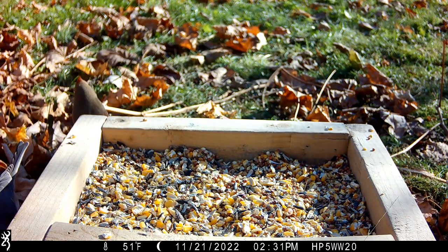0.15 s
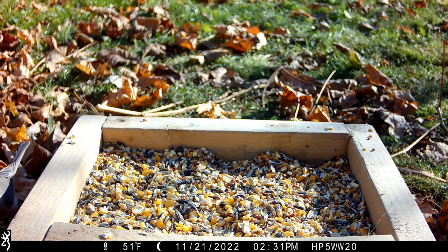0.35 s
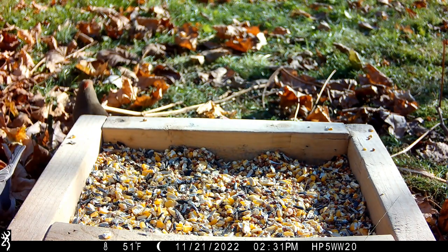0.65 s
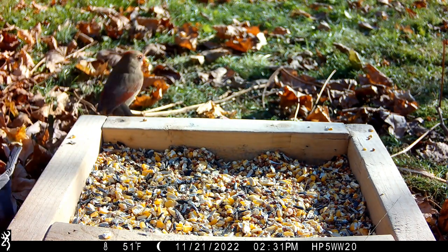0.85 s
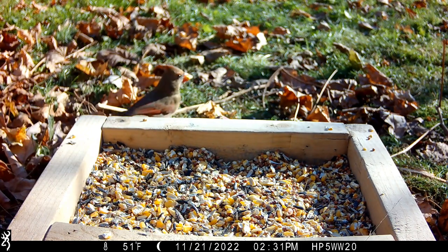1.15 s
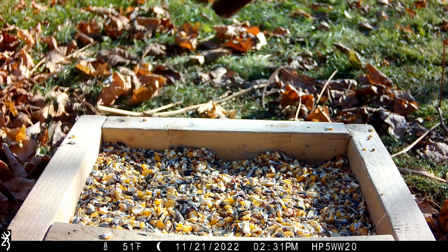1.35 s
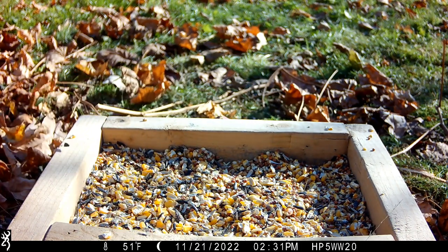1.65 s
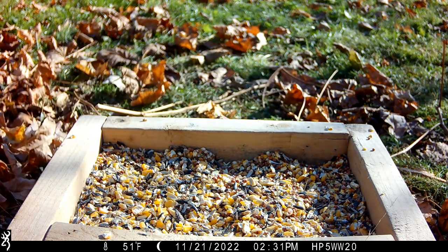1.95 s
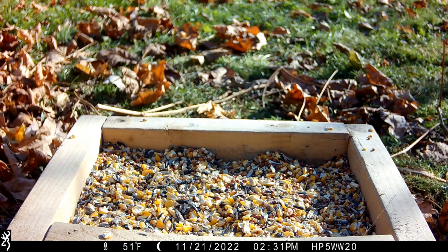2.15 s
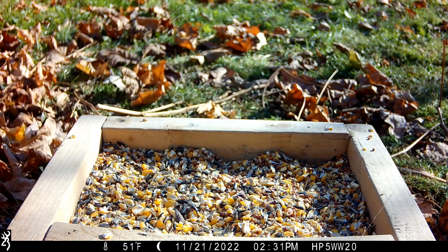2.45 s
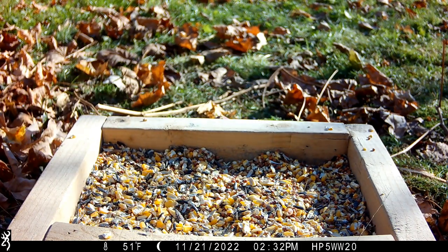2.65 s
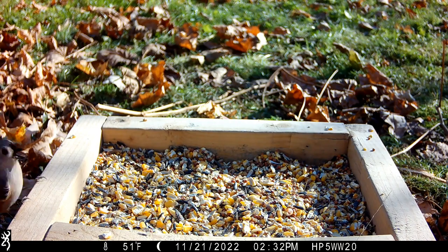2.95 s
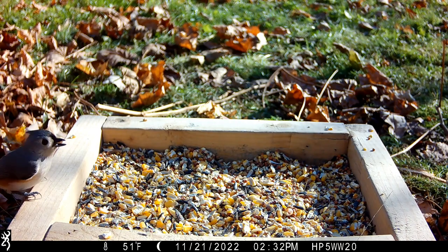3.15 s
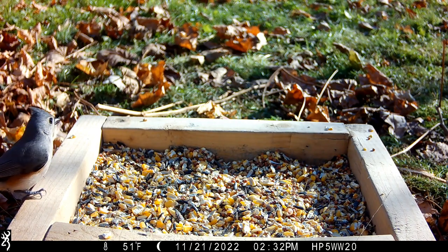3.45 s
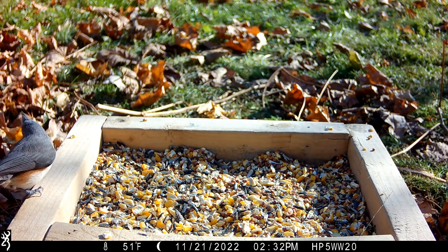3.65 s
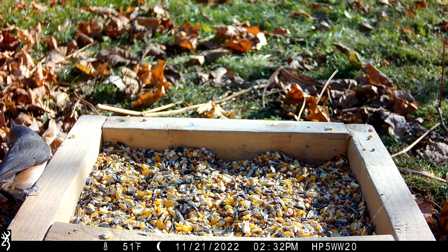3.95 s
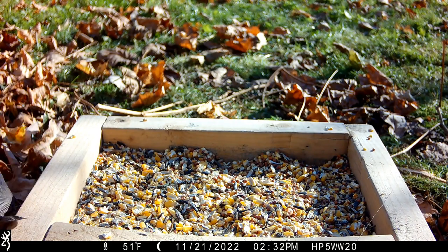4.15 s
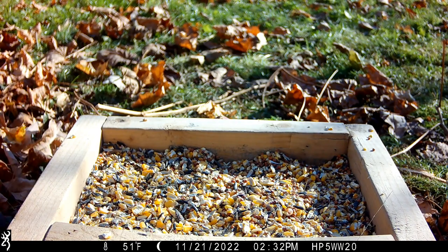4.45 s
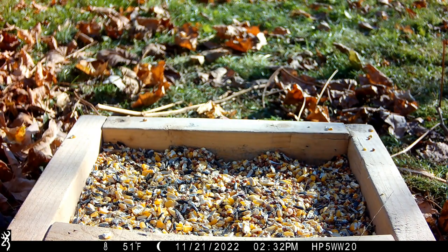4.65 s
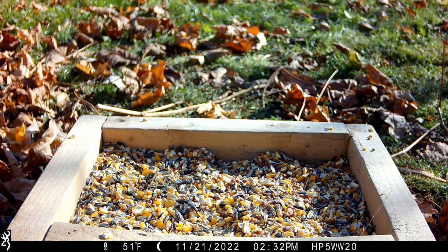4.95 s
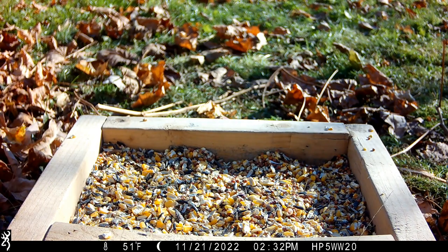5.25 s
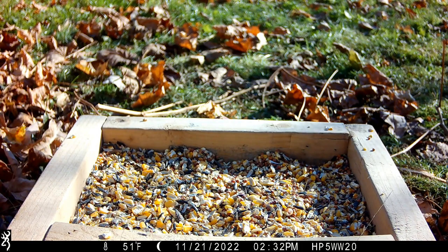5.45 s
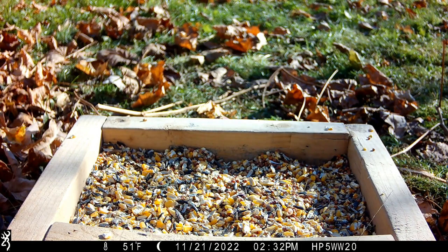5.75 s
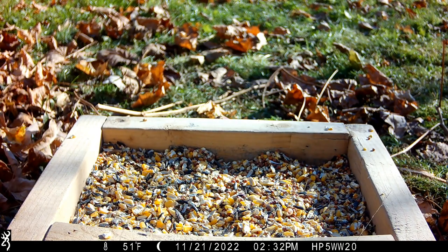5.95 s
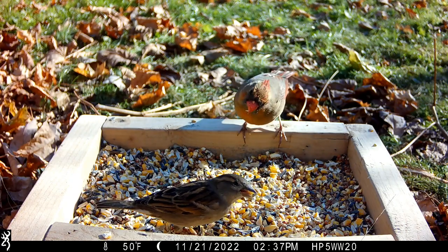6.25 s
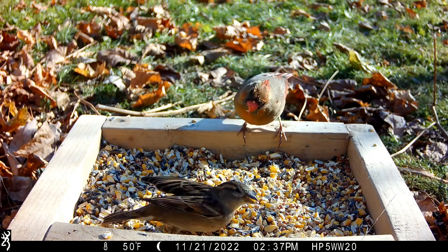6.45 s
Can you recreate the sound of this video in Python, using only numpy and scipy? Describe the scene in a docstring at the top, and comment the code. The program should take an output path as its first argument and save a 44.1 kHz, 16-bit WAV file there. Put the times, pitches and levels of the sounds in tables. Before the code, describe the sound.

A steady, quiet outdoor hush surrounds a small mono microphone on the rim of a garden feeding tray. A close chirp leads into a brief flurry of wingbeats and leaf rustles, with faint birds farther off. Midway, a thin high whistle runs straight into three nasal, slightly raspy calls from a small songbird, the loudest sounds. Afterwards come short claw scrapes on wood and a couple of light crunches in seed.

```python
"""On a lawn, at a wooden seed tray: a small songbird gives a thin high note and three nasal calls.
One side of its syrinx whistles the note; in the calls both sides sound and modulate each other.
Other birds chip and whistle, wingbeats puff and swish, dry leaves rustle, and feet tick on the wood,
scuff it and crunch the seed, all over a steady outdoor hush.
A small mono camera microphone with a faint whine sits at the edge of the tray."""
import sys
import numpy as np
from scipy import signal
from scipy.fft import rfft, irfft, next_fast_len
from scipy.io import wavfile
from scipy.ndimage import uniform_filter1d

SR = 44100
rng = np.random.default_rng(int(sys.argv[2]) if len(sys.argv) > 2 else 0)


def transcribe(u):
    """Save the signal u as a 16-bit wav file named by the first command-line argument.

    u: samples, shape (n,) or (channels, n), limited to [-1, 1]; the rate is SR.
    q: integer samples, one column per channel.
    """
    v = np.clip(np.atleast_2d(u).T, -1, 1)
    q = np.round(v * 32767).astype(np.int16)
    wavfile.write(sys.argv[1], SR, q)


N = 291060
TIME = np.arange(N) / SR


def undb(db):
    """Decibels to gain."""
    return 10 ** (np.asarray(db) / 20)


def unit(x):
    """Scale to rms 1."""
    return x / np.sqrt(np.mean(x ** 2) + 1e-18)


def noise():
    """White noise."""
    return rng.standard_normal(N)


def wander(rate):
    """Smooth random motion with spread 1, about rate turns a second."""
    size = max(int(SR / rate), 2)
    return unit(uniform_filter1d(uniform_filter1d(noise(), size), size))


def colour(x, points):
    """Minimum-phase EQ through (f/Hz, gain/dB) points; the result has rms 1."""
    hz, db = np.transpose(points)
    size = 2 * next_fast_len(N // 2 + 2048)
    grid = np.maximum(np.arange(size // 2 + 1) * SR / size, 1)
    response = undb(np.interp(np.log(grid), np.log(hz), db))
    cepstrum = irfft(np.log(response))
    cepstrum[1:size // 2] *= 2
    cepstrum[size // 2 + 1:] = 0
    return unit(irfft(rfft(x, size) * np.exp(rfft(cepstrum)))[:N])


def resonance(hz, centre_hz, width_hz):
    """Bell-shaped response, 1 at the centre."""
    return 1 / (1 + (2 * (hz - centre_hz) / width_hz) ** 2)


def steady(x, seconds):
    """Even out the level of a carrier over the given time."""
    power = uniform_filter1d(x ** 2, max(int(seconds * SR), 2))
    return x / np.sqrt(np.abs(power) + 1e-9)


def envelope(start, hold, attack, decay):
    """Exponential rise up to the start, a hold at 1, exponential decay."""
    t = TIME - start
    return np.exp(np.maximum(np.minimum(t, 0) / attack - np.maximum(t - hold, 0) / decay, -30))


def controls(notes):
    """A gate that is open while any note runs, then the notes' columns as automation curves."""
    gate = sum(((TIME >= rows[0][0]) & (TIME <= rows[-1][0])) * 1. for rows in notes)
    s, *columns = np.vstack(notes).T
    return [uniform_filter1d(gate, size=40)] + [np.interp(TIME, s, c) for c in columns]


def grains(spread_db, points):
    """Dense tiny impacts of uneven size ringing a body of the given colour."""
    return colour(noise() * undb(spread_db * wander(1500)), points)


# EQ of the background bed: f/Hz, gain/dB
HUSH_EQ = [(15, -55), (25, -13), (55, -18), (86, -13), (183, -14.5), (240, -12), (389, -10.5), (648, -3.5),
           (1110, -2), (1530, -1.5), (2360, -2.5), (6730, -30.5), (7700, -34), (8580, -33.5), (15500, -26)]
# its fader ride, before the trim: t/s, level/dB
HUSH_RIDE = [(0.0, -49.5), (0.96, -49.5), (6.6, -52)]


def hush(trim_db=-1.67, whine_hz=7810, whine_db=-88):
    """Steady outdoor air and microphone hiss, with a faint electronic whine."""
    s, db = np.transpose(HUSH_RIDE)
    air = colour(noise(), HUSH_EQ) * undb(np.interp(TIME, s, db) + trim_db)
    return air + undb(whine_db) * np.sqrt(2) * np.sin(2 * np.pi * whine_hz * TIME)


# EQ of the crisp top on leaves, claws, feathers and seed: f/Hz, gain/dB
CRISP_EQ = [(3000, -37), (7000, -18), (9500, -1.5), (12000, 7.5), (14000, 9), (16000, 0)]


def scrape(levels, points, body_spread_db, top_spread_db, trim_db=0):
    """Crowds of small contacts: a woody body with a crisp top."""
    body_level, top_level = levels
    body = steady(grains(body_spread_db, points), 0.015)
    top = grains(top_spread_db, CRISP_EQ)
    return undb(trim_db) * (body_level * body + top_level * top)


def stirs(rows, patchy_db, rate, attack_s=0.025):
    """Restless movement that swells, goes on unevenly and dies away: levels of body and treble."""
    body = top = 0
    uneven = undb(patchy_db * wander(rate))
    for s, length, db, decay, treble_db in rows:
        force = undb(db) * envelope(s, length, attack_s, decay)
        body, top = np.maximum(body, force), np.maximum(top, undb(treble_db) * force)
    return body * uneven, top * uneven


def crackles(per_s=45, decay_s=.0012, low_cut_hz=3500):
    """Sparse bright snaps of dry leaves."""
    snaps = (rng.random(N) < per_s / SR) * rng.random(N)
    bursts = signal.lfilter([1], [1, -np.exp(-1 / (decay_s * SR))], snaps) * noise()
    return unit(signal.sosfilt(signal.butter(2, low_cut_hz, "high", fs=SR, output="sos"), bursts))


# rustle cues: t/s, length/s, level/dB, decay/s, treble/dB
RUSTLES = [(.16, 0.038, -55, .02, -25), (.322, .012, -53.5, 0.043, -20), (.85, .30, -42, .03, -13.5),
           (1.16, 0.38, -40, 0.071, -14), (1.66, 0.17, -50, .08, -13.5), (2.93, .06, -48, .02, -9),
           (3.0, .06, -41, 0.069, -6)]
# EQ of leaves and feathers: f/Hz, gain/dB
RUSTLE_EQ = [(150, -49), (450, -13), (850, -2), (1500, 1), (2200, 5.5), (2900, -4), (3600, -2), (5000, -15),
             (6500, -23), (8000, -27.5), (11000, -25.5)]


def rustles(snap_db=-4):
    """Wings and dry leaves brush in patchy swells, with snaps riding the treble."""
    body, top = stirs(RUSTLES, patchy_db=2.5, rate=140)
    brush = scrape((body, top), RUSTLE_EQ, body_spread_db=1, top_spread_db=5, trim_db=-0.05)
    return brush + top * undb(snap_db) * crackles()


# tick cues: t/s, level/dB, decay/s, treble/dB
TICKS = [(.184, -38, 0.0051, -11.5), (.298, -35.5, 0.0033, -21), (.901, -35.5, 0.0087, -27),
         (1.635, -33.5, 0.0015, -9), (1.754, -36.5, 0.0058, -7), (1.866, -29, 0.003, -16),
         (2.988, -28.5, 0.0028, -15), (3.002, -31, 0.0038, -32), (4.23, -21.5, 0.0026, -0.5),
         (4.511, -38, .005, -16), (4.888, -47, .007, -6.5), (5.552, -40.5, .0032, -14),
         (5.989, -27.5, .002, -24), (6.447, -50, 0.018, -9)]
# EQ of the wooden tray: f/Hz, gain/dB
WOOD_EQ = [(100, -50), (350, -22.5), (900, -9.5), (1300, -3.5), (1550, -2.5), (2200, 5), (3000, -14),
           (3550, -1.5), (4600, -20.5), (5500, -22), (7500, -35.5), (11000, -50)]


def ticks(attack_s=0.000612):
    """Short scratches of claws and seed on wood that die within milliseconds."""
    body, top = np.zeros(N), np.zeros(N)
    for s, db, decay, treble_db in TICKS:
        start = int(s * SR)
        t = TIME[:min(SR // 4, N - start)]
        hit = undb(db) * (1 - np.exp(-t / attack_s)) * np.exp(-t / decay)
        body[start:start + len(t)] += hit
        top[start:start + len(t)] += undb(treble_db) * hit
    return body * steady(grains(1.3, WOOD_EQ), 0.00496) + top * steady(grains(3, CRISP_EQ), 0.0088)


def whistle(note, waver, overtone_db):
    """One side of the syrinx alone: a gliding near-sine whose octave grows with pitch."""
    gate, hz, db = controls([note])
    phase = 2 * np.pi * np.cumsum(hz * (1 + waver * wander(700))) / SR
    octave = undb(overtone_db) * (hz / 7000) ** 2
    return gate * undb(db) * (np.sin(phase) + octave * np.sin(2 * phase)) * np.sqrt(2)


def garden(x, t60, wet_db, predelay_s=.004):
    """Add the thin scatter from ground, trees and walls."""
    t = TIME[:SR // 2]
    tail = rng.standard_normal(len(t)) * undb(-60 * t / t60) * (t > predelay_s)
    return x + undb(wet_db) * signal.fftconvolve(x, tail / np.linalg.norm(tail))[:N]


# slurred chips, the first close by:
# t/s, length/s, from f/Hz, to f/Hz, glide/s, level/dB, fade/dB, overtone/dB, reverb/dB
CHIPS = [(0.819, .017, 6050, 7930, 0.0047, -26.5, 12, -4, -25),
         (0.859, 0.009, 6700, 6000, .006, -53, -1, -20, -14),
         (1.453, 0.02, 6600, 6800, 0.009, -52.5, 2, -20, -12),
         (2.132, 0.059, 6100, 7720, 0.0066, -54, 17, -8, -8)]


def chips(edge_s=0.0017):
    """Birds around the tray slide quickly onto a pitch and stop; the far ones are wetter."""
    out = 0
    for start, length, from_hz, to_hz, glide, db, fade_db, overtone_db, wet_db in CHIPS:
        t = np.arange(0, length, 1 / SR)
        hz = to_hz + (from_hz - to_hz) * np.exp(-t / glide)
        edges_db = -20 * np.exp(-2 * np.minimum(t, length - t) / edge_s)
        note = np.column_stack([start + t, hz, db - fade_db * t / length + edges_db])
        out += garden(whistle(note, waver=.007, overtone_db=overtone_db), t60=.25, wet_db=wet_db)
    return out


# runs of wingbeats: t/s, length/s, beat rate/Hz, first thump/dB
FLUTTERS = [(1.086, .24, 23.8, -48.5), (1.354, .22, 20.9, -51.5)]
# single wing flicks: t/s, thump/dB, swish before its trim/dB
FLICKS = [(.978, -74, -29.5), (1.178, -60, -30.5), (1.256, -62, -30.5), (1.387, -47, -56),
          (1.413, -71, -29), (1.772, -50, -57), (2.937, -53, -44)]
# slow eddies at the microphone: t/s, length/s, level/dB
EDDIES = [(1.07, 0.45, -68), (1.63, .17, -68.5), (2.12, .08, -71.5), (2.66, 0.33, -72.5), (3.28, .03, -71)]
# low-end EQ of thumps and eddies: f/Hz, gain/dB
PUFF_EQ = [(20, -1.5), (70, -7.5), (150, -4.5), (260, 0.5), (400, -7.5), (700, -39.5), (2000, -80.5)]


def wings(thump_s=0.0077, swish_s=.011, beat_fade_db=1.8, swish_trim_db=-4, crisp_db=-13):
    """Every stroke pushes a puff of air at the microphone while the feathers swish."""
    beats = [(s + t, db - beat_fade_db * k) for s, length, rate, db in FLUTTERS
             for k, t in enumerate(np.arange(0, length, 1 / rate))]
    strokes = [(s, db, db + 9) for s, db in beats] + list(FLICKS)  # a flutter is more swish than thump
    thump = sum(undb(db) * np.exp(-.5 * ((TIME - s) / thump_s) ** 2) for s, db, _ in strokes)
    swish = sum(undb(db) * np.exp(-.5 * ((TIME - s) / swish_s) ** 2) for s, _, db in strokes)
    eddies = sum(undb(db) * envelope(s, length, attack=.025, decay=.025) for s, length, db in EDDIES)
    feathers = steady(grains(6.7, RUSTLE_EQ), 0.0072) + undb(crisp_db) * grains(4, CRISP_EQ)
    air = steady(colour(noise(), PUFF_EQ), .03)
    return (thump + eddies) * air + undb(swish_trim_db) * swish * feathers


# arch of the distant whistle: t/s, f/Hz, level/dB
FAR_WHISTLE = [(2.626, 2600, -44), (2.645, 2850, -45.5), (2.665, 3650, -42), (2.688, 4230, -52),
               (2.710, 3750, -44), (2.730, 3250, -47.5)]


def far_bird():
    """A faint whistle rises and falls, washed in garden scatter."""
    return garden(whistle(FAR_WHISTLE, waver=0.017, overtone_db=-26), t60=.3, wet_db=-12.5)


# held part of the thin high note: t/s, f/Hz, level/dB
HIGH_NOTE = [(2.964, 7450, -55), (2.977, 8020, -31), (2.991, 8310, -27.5), (3.004, 8340, -21),
             (3.014, 8320, -24), (3.027, 8440, -25), (3.037, 8150, -24.5)]


def high_note(plunge_s=0.013, octaves_per_s=190, plunge_db=-30.5, flare_db=18):
    """A held whistle ends in a plunge that flares as it crosses the bill resonance."""
    held_until, top_hz, _ = HIGH_NOTE[-1]
    t = np.arange(0, plunge_s, 1 / SR)[1:]
    hz = top_hz * 2 ** (-octaves_per_s * t)
    db = plunge_db + flare_db * resonance(hz, centre_hz=3300, width_hz=1200)
    plunge = np.column_stack([held_until + t, hz, db])
    return whistle(np.vstack([HIGH_NOTE, plunge]), waver=0.0047, overtone_db=-6.5)


def tray_echo(x, delay_s=0.0043, echo_db=-6, high_cut_hz=4200):
    """Add one dull reflection from the tray and the ground under it."""
    dull = signal.sosfilt(signal.butter(2, high_cut_hz, fs=SR, output="sos"), x)
    return x + undb(echo_db) * np.interp(TIME - delay_s, TIME, dull)


def nasal_shape(call, attack_s=0.021, release_s=0.012, relax_s=.028, beak_swing_db=15.5, waver=.005):
    """Effort builds, then collapses; it lifts both voices, opens the beak and clears the tone."""
    start, length, low_from, low_to, high_from, high_to, bend, db, swell_db, open_db, lag, rough = call
    t = np.arange(0, length, 1 / SR)
    ending = lambda seconds: np.clip(1 - (length - t) / seconds, 0, 1) ** 2
    build = 1 - np.clip(1 - t / (length - relax_s), 0, 1) ** bend
    collapse = .95 * ending(relax_s)
    effort = build - collapse
    fades_db = -13 * np.clip(1 - t / attack_s, 0, 1) ** 2 - 31 * ending(release_s)
    level_db = db + swell_db * t / length + fades_db
    beak_db = open_db - beak_swing_db * (1 - build ** lag + collapse)
    low_hz = (low_from + (low_to - low_from) * effort) * (1 + waver * wander(128)[:len(t)])
    high_hz = (high_from + (high_to - high_from) * effort) * (1 + waver * wander(128)[:len(t)])
    roughness = rough + 0.35 * (1 - effort) ** 2
    return np.column_stack([start + t, low_hz, high_hz, level_db, beak_db, roughness])


# EQ of the valve clicks: f/Hz, gain/dB
BUZZ_EQ = [(3000, -33), (4700, 10.5), (5300, -15), (5800, 7), (6200, -3), (6700, 7.5), (7300, -9),
           (8400, 2), (9300, -2), (10500, -43), (13700, -3), (16000, -28)]


def valve_buzz(on, low_phase, high_phase):
    """Each closing of one side of the syrinx clicks, harder when the other side is open."""
    clicks = np.zeros(N)
    for own, other in ((low_phase, high_phase), (high_phase, low_phase)):
        clicks[on] += np.exp(150 * (np.cos(own) - 1)) * (1 + 0.49 * np.cos(other))
    return steady(colour(clicks, BUZZ_EQ), 0.016)[on]


# EQ of the breath: f/Hz, gain/dB
RASP_EQ = [(400, -61), (1000, -28.5), (1600, -10), (2100, -18), (2650, -29), (3600, -2.5), (4600, -29),
           (8500, -28.5), (11000, -37), (16000, -40)]


def breath_rasp(on, phase_gap):
    """Air rushes through the valves, pulsing at the beat between the two voices."""
    air = noise()
    air[on] *= 1 + 0.88 * np.cos(phase_gap)
    return colour(air, RASP_EQ)[on]


# tones of the coupled voices: low-voice multiple, high-voice multiple, level before resonances/dB
PARTIALS = [(1, 0, -24.5), (0, 1, -3.5), (2, 0, 2), (-1, 2, -21), (1, 1, -4), (3, 0, 0.5), (0, 2, -1.5),
            (2, 1, -6), (4, 0, -7.5), (1, 2, -18), (3, 1, -17), (0, 3, -17), (5, 0, -39), (2, 2, -18),
            (4, 1, -33), (6, 0, -18), (3, 2, -19), (5, 1, -29), (2, 3, -24), (4, 2, -28.5)]
# call cues: t/s, length/s, low voice from f/Hz, to f/Hz, high voice from f/Hz, to f/Hz,
# bend (1 = straight), level/dB, swell/dB, widest beak/dB, beak lag (1 = in step with effort),
# roughness (0-1), bill resonance f/Hz, its boost/dB, fundamental boost/dB
NASAL_CALLS = [(3.089, .145, 775, 926, 1264, 1514, .65, -24, 3.5, 3.8, 0.89, 0.57, 3220, 9.5, 10),
               (3.275, .163, 789.5, 944, 1245, 1583, 1.21, -21, -1, 2.4, 1.3, 0.22, 2980, -2, 8),
               (3.528, 0.16, 772, 965.6, 1224, 1601, 2.1, -22, 0.5, 5, 2.1, 0.25, 1770, 3.5, -6)]


def nasal_calls(drift=0.0076, jitter_rad=0.32, shimmer=0.44, throat_db=9.5, buzz_db=-27, rasp_db=-9):
    """Both sides of the syrinx modulate each other: sum tones under throat and bill resonances."""
    gate, *curves = controls([nasal_shape(row[:-3]) for row in NASAL_CALLS])
    on = gate > 1e-6
    low_hz, high_hz, db, open_db, rough = (c[on] for c in curves)
    calls = np.array(NASAL_CALLS)
    middles = calls[:, 0] + calls[:, 1] / 2
    nearest = np.abs(TIME[on, None] - middles).argmin(axis=1)
    bill_hz, bill_db, fundamental_db = calls[nearest, -3:].T
    phases = [2 * np.pi * np.cumsum(hz * (1 + drift * rough * wander(260)[on])) / SR
              for hz in (low_hz, high_hz)]
    # each side trembles around its steady swing
    low, high = (phase + jitter_rad * rough * wander(450)[on] for phase in phases)
    tremolos = [1 + shimmer * rough * wander(210)[on] for _ in range(3)]
    tone = 0
    for k, (m, n, partial_db) in enumerate(PARTIALS):
        hz = m * low_hz + n * high_hz
        throat = resonance(hz, centre_hz=2657, width_hz=370)
        bill = resonance(hz, bill_hz, width_hz=330)
        # a nearly shut beak favours the throat resonance; opening lets the other tones out
        tract_db = throat_db * throat + open_db * (2 - throat) + bill_db * bill
        gain = undb(partial_db + tract_db + (k == 0) * fundamental_db)
        lag = rng.uniform(0, 2 * np.pi)  # the windpipe delays each tone differently, softening beats
        tone += gain * tremolos[k % 3] * np.sin(m * low + n * high + lag)
    rasp = undb(rasp_db) * rough * breath_rasp(on, high - low)
    buzz = undb(buzz_db + 0.24 * open_db) * valve_buzz(on, *phases)
    voice = np.zeros(N)
    voice[on] = undb(db) * (steady(tone, 0.011) + buzz + rasp)
    return gate * voice


def steps(rows, touch_db, attack_s=0.0004):
    """Force of a foot that touches lightly, then pushes: levels of body and treble."""
    body = top = 0
    for s, wait, push, db, decay, treble_db in rows:
        touch = undb(touch_db) * envelope(s, wait, attack_s, decay)
        force = undb(db) * np.maximum(touch, envelope(s + wait, push, attack_s, decay))
        body, top = body + force, top + undb(treble_db) * force
    return body, top


# footsteps on the rim: t/s, wait/s, push/s, level/dB, decay/s, treble/dB
SCUFFS = [(4.196, .011, 0.019, -23.5, 0.022, -15.5), (4.387, 0.026, 0.013, -33.5, 0.025, -16)]


def scuffs():
    """Feet scrape the wooden rim of the tray."""
    force = steps(SCUFFS, touch_db=-8)
    return scrape(force, WOOD_EQ, body_spread_db=3.5, top_spread_db=3.5, trim_db=-0.46)


# seed stirred lightly: t/s, length/s, level/dB, decay/s, treble/dB
SHUFFLES = [(5.05, 0.3, -54.5, 0.027, -19), (5.956, 0.005, -43, 0.016, -16)]
# footsteps in the seed: t/s, wait/s, push/s, level/dB, decay/s, treble/dB, husk rattle/dB
CRUNCHES = [(5.21, 0.0273, 0.0096, -32.5, 0.0024, -25.5, -2), (5.25, 0.0095, 0.0062, -42, 0.0044, -18, -10),
            (5.990, .024, 0.016, -23.5, 0.0018, -20, -10)]
# duller EQ of seed giving way: f/Hz, gain/dB
SEED_EQ = [(100, -49), (450, -35), (1100, -11.5), (1600, -9), (2050, 2), (2400, -6), (3050, -16.5),
           (3650, -7), (4400, -26), (5500, -34.5), (11000, -63)]


def crunches(husk_hz=3650, husk_width_hz=1400):
    """Feet stir the seed softly and sink into it, each step with its own amount of husk rattle."""
    shuffle = stirs(SHUFFLES, patchy_db=4, rate=76)
    out = scrape(shuffle, SEED_EQ, body_spread_db=3, top_spread_db=5.5)
    for *step, husk_db in CRUNCHES:
        eq = [(hz, db + husk_db * resonance(hz, husk_hz, husk_width_hz)) for hz, db in SEED_EQ]
        force = steps([step], touch_db=-13)
        out += scrape(force, eq, body_spread_db=-0.2, top_spread_db=3.5, trim_db=0.05)
    return out


def scene():
    """Near and far birds, their movements and the hush, alike in both channels."""
    songbird = garden(nasal_calls() + tray_echo(high_note()), t60=.15, wet_db=-39)
    birds = songbird + far_bird() + chips()
    foley = scuffs() + rustles() + crunches() + wings() + ticks()
    mono = birds + foley + hush()
    return np.array([mono, mono])


def record(dry):
    """The camera cuts the top steeply."""
    high_cut_hz = 15900
    return signal.sosfilt(signal.ellip(10, .2, 70, high_cut_hz, fs=SR, output="sos"), dry)


dry = scene()
out = record(dry)
transcribe(out)
```